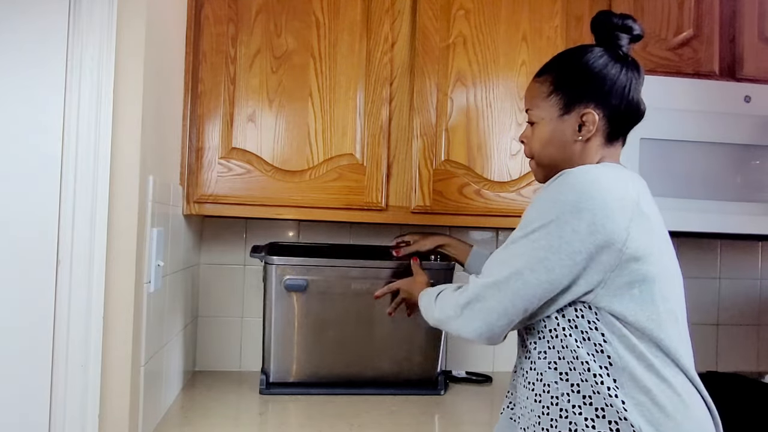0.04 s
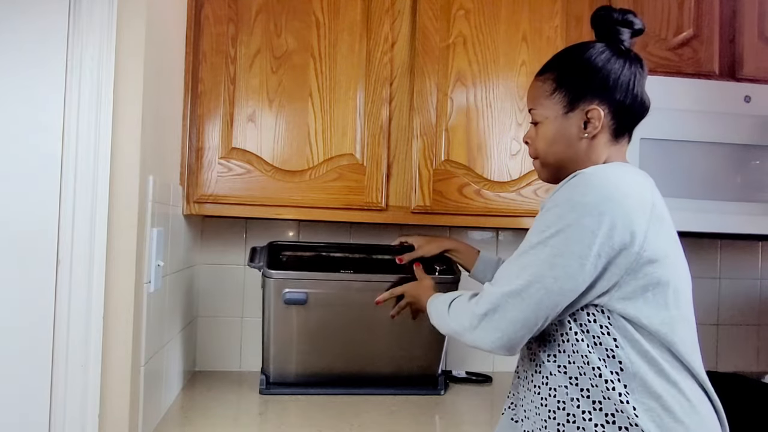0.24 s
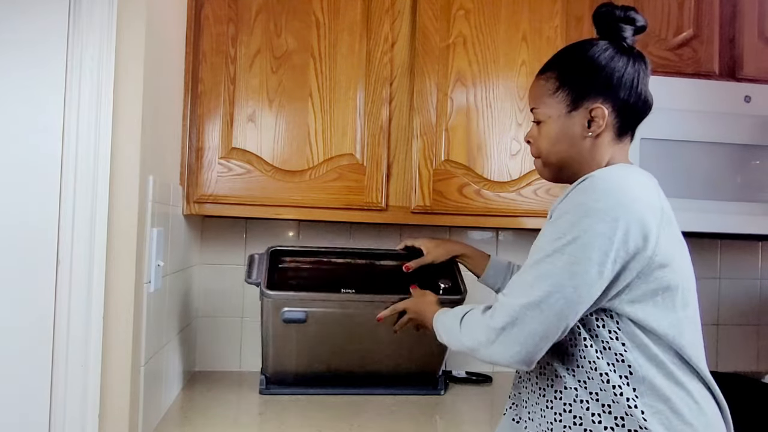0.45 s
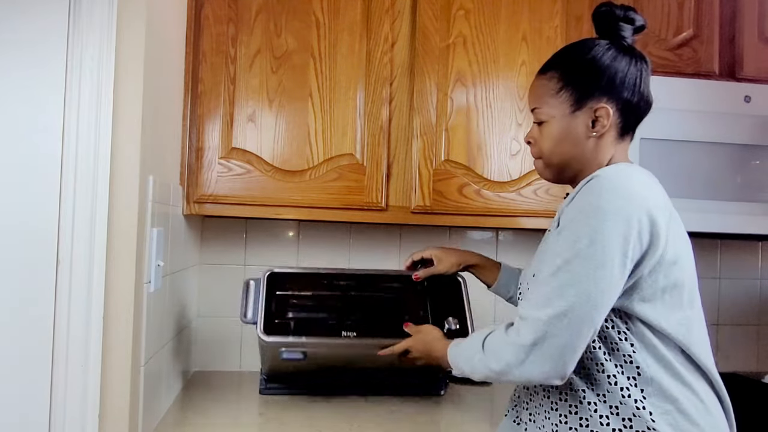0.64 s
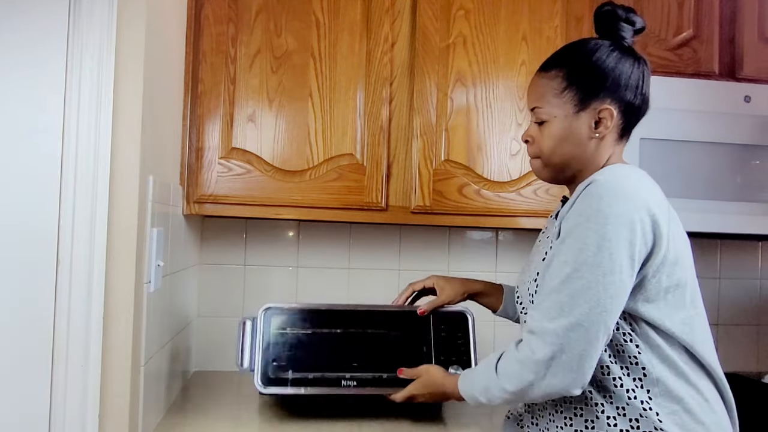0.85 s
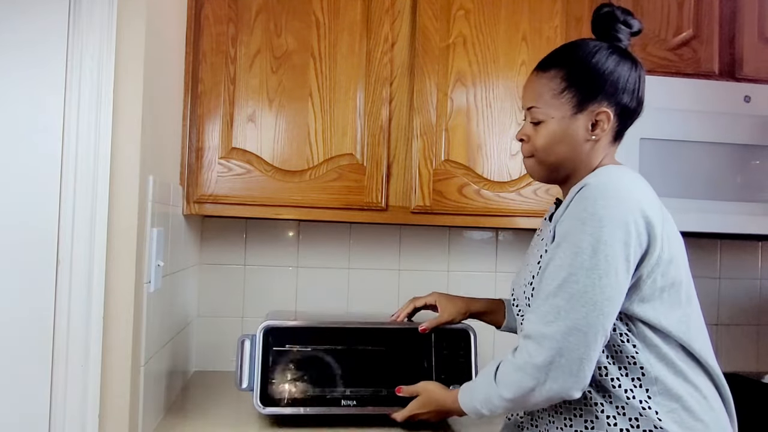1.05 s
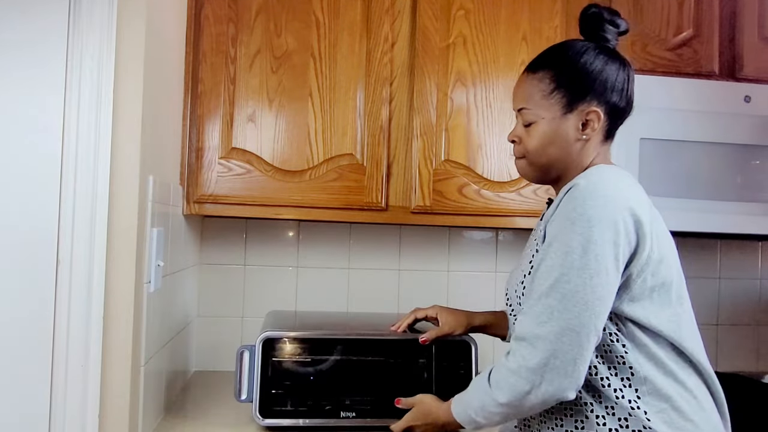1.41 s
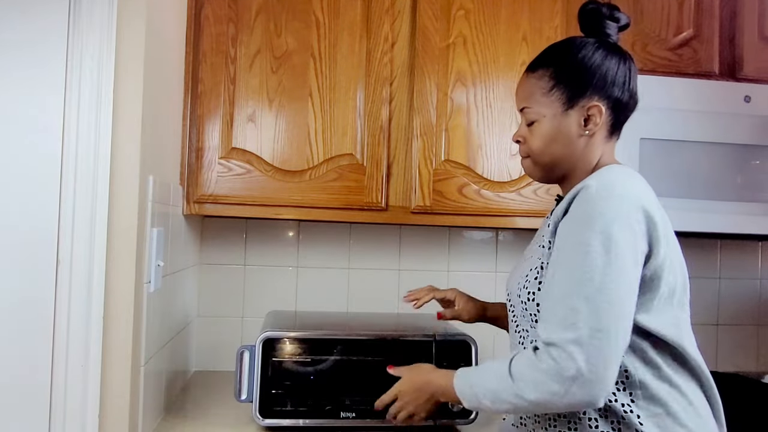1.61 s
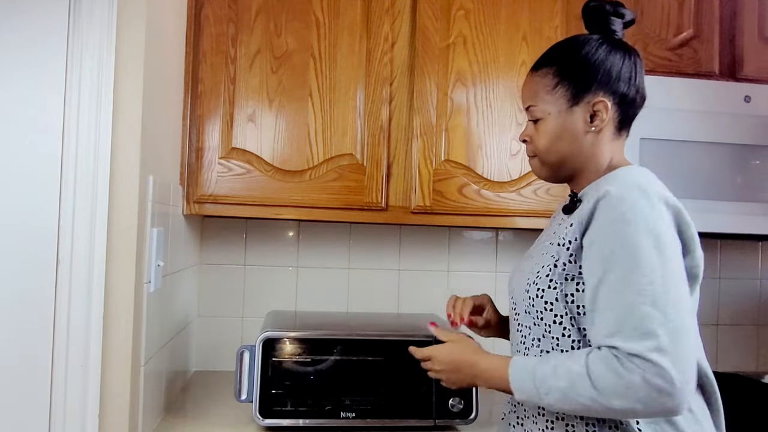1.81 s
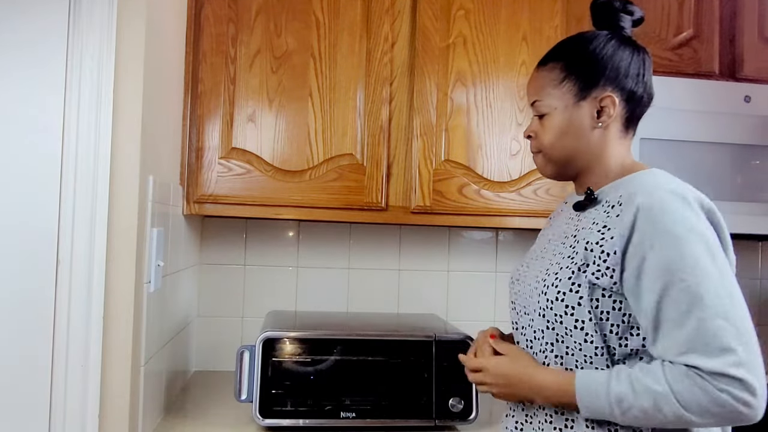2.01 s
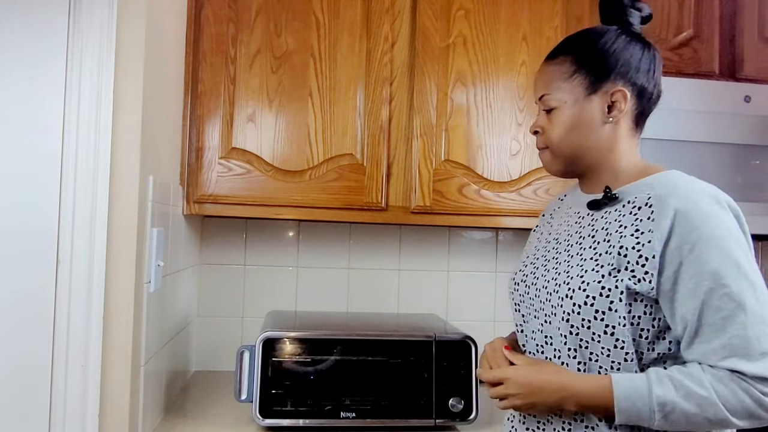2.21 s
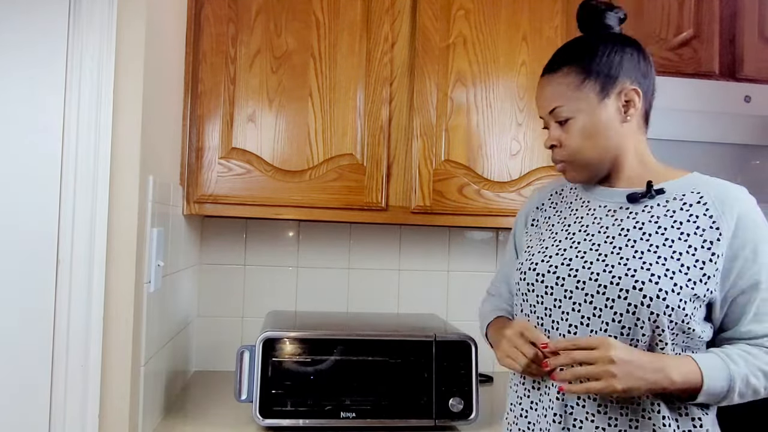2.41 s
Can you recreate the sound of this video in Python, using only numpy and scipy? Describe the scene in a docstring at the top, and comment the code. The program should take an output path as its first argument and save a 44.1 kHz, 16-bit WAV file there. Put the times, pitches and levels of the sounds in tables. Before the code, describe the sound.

A loud, ringing metal clatter comes from a tray toppling inside a small oven being tipped down. A weaker thud and rack rattle follow as it lands, then a soft hand pat in a faintly humming kitchen.

```python
"""A loose tray falls over with a loud steel clatter inside a countertop oven that is being tipped down
from upright in a small kitchen. The hinge squeaks faintly, the tray strikes the case and rocks to rest,
and a panel drones through the swing. The feet thud on the counter, the rack jiggles, and hands meet in a
soft pat over a low ventilation hum. Each blow is a click and a brief chatter that set a body ringing."""
import sys
import numpy as np
from scipy import signal
from scipy.fft import rfft, irfft
from scipy.io import wavfile
from scipy.ndimage import uniform_filter1d

SR = 44100
rng = np.random.default_rng(int(sys.argv[2]) if len(sys.argv) > 2 else 0)


def master_out(mix):
    """Clip the mix to full scale and print it as 16-bit PCM to the path in sys.argv[1]."""
    frames = np.transpose(np.atleast_2d(mix))
    ceiling = np.clip(frames, -1, 1)
    pcm = np.round(ceiling * 32767).astype(np.int16)
    wavfile.write(sys.argv[1], SR, pcm)


N = 112454
TOP_HZ = 15800
# spectrum of the ventilation air (frequency [Hz], level [dB])
AIR_COLOUR = [(18, -61.5), (30, -29.5), (219, -25), (256, -8.5), (341, -3.5), (673, -12), (1080, -27),
              (1470, -25), (2180, -44.5), (2360, -34.5), (2910, -44.5), (3320, -34), (6720, -45),
              (15500, -45)]


def tray_crash():
    """The falling tray hits the steel case: a short crack, a dense ring and a few strong modes."""
    # tray hits (time [s], level [dB], brightness [Hz], chatter decay [s])
    blows = [(.2008, -3.5, 7000, .0015), (.2058, 0, 14000, .003), (.2188, -1, 15000, .006),
             (.229, -3, 17000, .005), (.251, 1, 1500, .006), (.265, 1.5, 1200, .005),
             (.2816, 0, 7000, .005), (.295, -3.5, 7000, .008), (.347, -12, 12000, .004),
             (.361, -19, 12000, .003), (.402, -13.5, 14000, .008), (.422, -23, 17000, .008),
             (.458, -20, 15000, .012)]
    # dense resonances of the case (frequency [Hz], level [dB])
    colour = [(24, -60), (40, -39.5), (133, -13), (167, -10.5), (215, -5), (249, -16), (283, -8.5),
              (372, -10.5), (412, -0.5), (570, -15.5), (715, -9.5), (1090, -15.5), (1180, -11.5),
              (1410, -16), (1900, -16.5), (3140, -13.5), (4460, -24.5), (14500, -31.5), (16000, -49.5)]
    # their ring time (frequency [Hz], t60 [s])
    decay = [(60, 0.42), (150, .47), (300, 0.24), (600, 0.29), (1000, 0.43), (3000, 0.34), (6300, 0.38),
             (8000, .21), (15000, 0.15)]
    # strong modes of the case (frequency [Hz], level [dB], t60 [s])
    modes = [(144, -5, .4), (216.4, -0.5, .2), (281, 0.5, 0.29), (417, 1, 0.14), (729, -4, .25),
             (788, -5, .3), (953, -2, 0.58), (1034, -3, .4), (1250, -7, .3), (1339, -1.5, .3),
             (1410, -1, .42), (2504, -3, 0.49), (2850, -3, 0.38), (3400, 1, 0.27)]
    case = amp(-10.5) * wash(colour, decay)
    crack = amp(-12) * wash(colour, [(1000, .03)])
    return strike(blows, case + crack) + strike(blows, amp(-27.5) * ring(modes), chatter=.45)


def tray_rocking():
    """The tray rocks to rest, ringing and rattling at each contact."""
    # rocking contacts (time [s], level [dB], brightness [Hz], chatter decay [s])
    rocks = [(.47, 1, 4000, 0.054), (.54, -0.5, 3020, 0.017), (.565, -3.5, 4070, 0.0067),
             (.632, -7, 6000, 0.0059), (.745, -11.5, 1400, 0.023), (.888, -26, 3000, 0.04),
             (.94, -29, 3000, 0.033)]
    # tray modes (frequency [Hz], level [dB], t60 [s])
    modes = [(641, -8, 0.22), (628, -4, 0.36), (1060, -8, 0.1), (1575, -6, 0.31), (1587, -4, 0.34),
             (1696, -9, .25), (2100, -11, .25), (2205, -12.5, 0.53), (2370, -15.5, 0.23),
             (3000, -14.5, 0.11)]
    # rattle spectrum (frequency [Hz], level [dB])
    colour = [(88, -31), (150, -8), (394, -26), (627, -22), (691, -9.5), (1210, -23.5), (1620, -20),
              (1870, -5), (2270, -24), (5960, -20.5), (7000, -57.5), (9100, -82.5), (15400, -120)]
    rattle = amp(-47) * wash(colour, [(1000, .4)])
    return strike(rocks, amp(-30.5) * ring(modes) + rattle, chatter=.92)


def feet_thud():
    """The feet land with a thud and drive the low modes of the counter."""
    # foot hits (time [s], level [dB], brightness [Hz], chatter decay [s])
    blows = [(1.3145, -13, 500, .002), (1.3195, 0, 600, 0.0028), (1.3245, -2.5, 170, .002),
             (1.337, 1, 1300, 0.0048), (1.358, -10, 400, 0.0013), (1.386, -19, 500, .004)]
    # thud spectrum (frequency [Hz], level [dB])
    colour = [(21, -31), (35, -5.5), (173, -6), (323, -19.5), (510, 2), (839, -7), (950, 0), (1320, -8.5),
              (1530, -25), (2130, -13.5), (2470, -28.5), (2800, -36), (5000, -46), (6500, -88),
              (11000, -120)]
    # its ring time (frequency [Hz], t60 [s])
    decay = [(60, .2), (150, 0.71), (400, 0.17), (1000, 0.21), (5000, 0.37)]
    # modes of the loaded counter (frequency [Hz], level [dB], t60 [s])
    modes = [(64.3, -5, .2), (112, 5, 0.064), (152, 9, 0.035), (185, -5, 0.086), (269, -6.5, 0.058),
             (509, -19.5, 0.34)]
    thud = strike(blows, amp(-21) * wash(colour, decay))
    return thud + strike(blows, amp(-16.5) * ring(modes), chatter=0)


def rack_jiggle():
    """The wire rack ticks once in the swing, then jiggles as the landing shakes it."""
    # rack hits (time [s], level [dB], brightness [Hz], chatter decay [s])
    blows = [(.965, -28.5, 3900, 0.0052), (1.333, -3, 1760, 0.012), (1.354, 2.5, 2500, .01),
             (1.379, 0.5, 3040, 0.0049), (1.426, 1.5, 12000, 0.0043), (1.439, -3, 10100, 0.0026),
             (1.483, -2.5, 2500, 0.0088), (1.53, -8.5, 2000, .008), (1.57, -29, 3000, 0.003)]
    # dense resonances of the rack (frequency [Hz], level [dB])
    colour = [(150, -33), (250, -42), (346, -5.5), (609, -4.5), (975, 0.5), (1160, -14.5), (1350, 5),
              (1530, -19), (1960, -0.5), (2230, -13.5), (2790, -9.5), (6080, -18.5), (12000, -61.5),
              (15600, -103), (22000, -120)]
    # their ring time (frequency [Hz], t60 [s])
    decay = [(300, 0.35), (2000, 0.27), (8000, 0.2)]
    # rack modes (frequency [Hz], level [dB], t60 [s])
    modes = [(526.2, 0, 0.23), (790, -2.5, 0.18), (918, -5, 0.27), (1305, -1, .24), (1374, -6, 0.31),
             (1990, -18, 0.42), (2096, -7.5, 0.31), (2840, 1.5, 0.11), (3300, -23, 0.17), (5920, -6, 0.078)]
    return strike(blows, amp(-34.5) * wash(colour, decay) + amp(-39) * ring(modes))


def panel_drone(pitch_hz=123.6, waver_db=.9):
    """One low panel mode and the case's rumble, kept going by the swing and kicked by the landing."""
    # drone envelope (time [s], level [dB])
    levels = [(.25, -48), (.5, -47.5), (.8, -49.5), (.9, -55), (1.0, -48), (1.15, -54), (1.3, -50.5),
              (1.37, -33.5), (1.55, -44.5), (1.7, -59.5), (1.9, -69), (2.1, -86)]
    # rumble spectrum (frequency [Hz], level [dB])
    rumble = [(45, -11.5), (70, -10.5), (100, -12.5), (135, 0.5), (165, -6), (200, -9.5), (280, -18.5),
              (500, -31)]
    t = np.arange(N) / SR
    envelope = amp(np.interp(t, *np.array(levels).T, left=-np.inf, right=-np.inf))
    waver = amp(waver_db * walk(24))
    phase = 2 * np.pi * np.cumsum(pitch_hz * (1 + .012 * walk(34))) / SR
    return envelope * (waver * unit(np.sin(phase)) + amp(-7.5) * noise(rumble))


def hand_pat():
    """Hands meet in a quick cluster of soft contacts: one dull, hollow pat."""
    # hand contacts (time [s], level [dB], brightness [Hz], chatter decay [s])
    pats = [(2.106, -16.5, 1500, 0.0055), (2.114, -5, 2000, 0.0029), (2.128, -6, 1980, 0.0013),
            (2.148, -13.5, 1980, 0.0047)]
    # pat spectrum (frequency [Hz], level [dB])
    colour = [(59, -49.5), (100, -19.5), (195, -28.5), (275, 0.5), (374, -23), (658, -2), (896, -2.5),
              (1220, -29), (1380, -18), (1580, -24), (6000, -64), (7800, -91), (13200, -120)]
    # its ring time (frequency [Hz], t60 [s])
    decay = [(200, 0.083), (800, .2), (3000, 0.42)]
    # hollow ring (frequency [Hz], level [dB], t60 [s])
    modes = [(285, -8, 0.25), (690, 2.5, 0.1), (807, 4.5, 0.24), (997, -2, .1)]
    body = strike(pats, amp(-34.5) * wash(colour, decay))
    return body + strike(pats, amp(-42.5) * ring(modes), chatter=.45)


def hinge_squeak(peak_s=.15, width_s=.025, pitch_hz=701.8):
    """The hinge gives a faint, unsteady squeak as the tipping starts."""
    t = np.arange(N) / SR
    swell = amp(-51) * np.exp(-((t - peak_s) / width_s) ** 2)
    return swell * unit(np.sin(2 * np.pi * pitch_hz * t + 1.1 * walk(120)))


def ventilation():
    """Room tone: fluttering air noise, a faint rumble and wavering hum lines."""
    # hum lines (frequency [Hz], level [dB])
    lines = [(355, -71.5), (532, -73), (1590, -92)]
    # rumble spectrum (frequency [Hz], level [dB])
    rumble = [(25, -5), (60, -2), (110, 0), (170, -1.5), (220, -10)]
    t = np.arange(N) / SR
    hum = sum(amp(db + 2 * walk(1.2)) * unit(np.sin(2 * np.pi * hz * t + .7 * walk(8)))
              for hz, db in lines)
    air = amp(-63.5 + .93 * walk(10)) * noise(AIR_COLOUR)
    return air + amp(-80) * noise(rumble) + hum


def strike(blows, body, chatter=.65):
    """Play blows into a body; chatter is the share of their energy that trails the first click."""
    t = np.arange(SR // 8) / SR
    force = np.zeros(N + SR)
    for start_s, db, bright_hz, decay_s in blows:
        push = rng.standard_normal(len(t)) ** 3 * np.exp(-t / decay_s)  # cubed noise is spiky
        push *= np.sqrt(chatter / np.sum(push ** 2))
        push[0] += np.sqrt(1 - chatter)
        softness = signal.butter(1, bright_hz, fs=SR, output="sos")
        i = int(start_s * SR)
        force[i:i + len(t)] += amp(db) * signal.sosfilt(softness, push)
    return signal.fftconvolve(force[:N], body)[:N]


def ring(modes):
    """Impulse response of a few strong modes: decaying sines with rounded attacks."""
    t = np.arange(SR) / SR
    out = 0
    for hz, db, t60 in modes:
        fade = np.exp(-np.log(1000) * t / t60) * (1 - np.exp(-2 * hz * t))
        out += amp(db) * np.sin(2 * np.pi * hz * t) * fade
    return out


def wash(colour, decay, attack_s=.0028):
    """Impulse response of crowded resonances and the room: third-octave noise bands dying away."""
    t = np.arange(SR) / SR
    hz = np.arange(SR // 2 + 1) + 1e-3
    white = rfft(rng.standard_normal(SR))
    shape = amp(along_hz(colour, hz)) * (hz < TOP_HZ)
    shape /= np.linalg.norm(shape)
    out = 0
    for centre in 1000 * 2 ** (np.arange(-14, 13) / 3):
        weight = shape * np.maximum(1 - np.abs(3 * np.log2(hz / centre)), 0)
        fade = np.exp(-np.log(1000) * t / along_hz(decay, centre)) * (1 - np.exp(-t / attack_s))
        band = irfft(white * weight, SR) * fade
        out += band * np.linalg.norm(weight) * np.linalg.norm(fade) / np.linalg.norm(band)
    return out


def noise(colour):
    """Noise of rms 1 with the given spectrum, falling away outside it."""
    hz = np.arange(N // 2 + 1) * SR / N + 1e-3
    low_hz, high_hz = colour[0][0], 1.15 * colour[-1][0]
    edges = 1 / np.sqrt((1 + (low_hz / hz) ** 8) * (1 + (hz / high_hz) ** 12))
    white = rfft(rng.standard_normal(N))
    return unit(irfft(white * amp(along_hz(colour, hz)) * edges, N))


def walk(rate_hz):
    """Smooth random motion with a spread of 1."""
    hold = int(SR / rate_hz)
    steps = np.repeat(rng.standard_normal(N // hold + 1), hold)
    return unit(uniform_filter1d(uniform_filter1d(steps, hold), hold)[:N])


def along_hz(points, hz):
    """Read (frequency [Hz], value) points on a log-frequency axis."""
    freqs, values = np.array(points, float).T
    return np.interp(np.log(np.maximum(hz, 1)), np.log(freqs), values)


def amp(db):
    """Decibels to gain."""
    return 10 ** (np.asarray(db) / 20)


def unit(x):
    """Scale to a standard deviation of 1."""
    return x / (np.std(x) + 1e-12)


def scene():
    """The action is centred; the air and a faint delayed copy of the sound give a trace of width."""
    # the air drifts to the right (time [s], side gain [ratio])
    lean = [(1.4, -0.061), (2.0, -0.18), (2.4, -.16)]
    air = ventilation()
    mid = hinge_squeak() + tray_crash() + tray_rocking() + panel_drone()
    mid += feet_thud() + rack_jiggle() + hand_pat() + air
    width = amp(-50.5) * np.pad(mid, (int(.007 * SR), 0))[:N]
    wide_air = amp(-80.5) * noise(AIR_COLOUR)
    drift = air * np.interp(np.arange(N) / SR, *np.array(lean).T)
    side = width + wide_air + drift
    return np.array([mid + side, mid - side])


def record(dry, low_cut_hz=44, drive_db=.5, ceiling=.97):
    """Drop the deepest bass, round the loudest peaks and cut the top."""
    low_cut = signal.butter(3, low_cut_hz, "high", fs=SR, output="sos")
    high_cut = signal.ellip(10, .2, 80, TOP_HZ, fs=SR, output="sos")
    driven = signal.sosfilt(low_cut, dry) * amp(drive_db)
    rounded = driven / (1 + (driven / ceiling) ** 8) ** (1 / 8)
    return signal.sosfilt(high_cut, rounded)


dry = scene()
out = record(dry)
master_out(out)
```